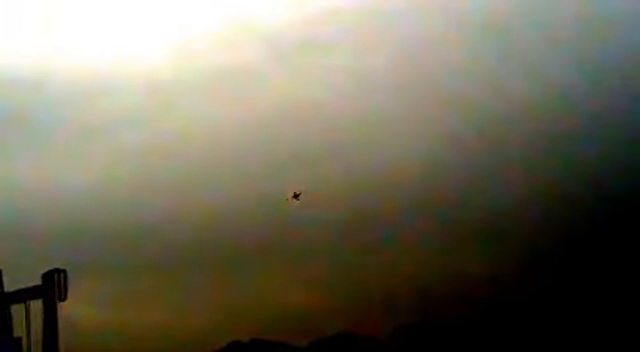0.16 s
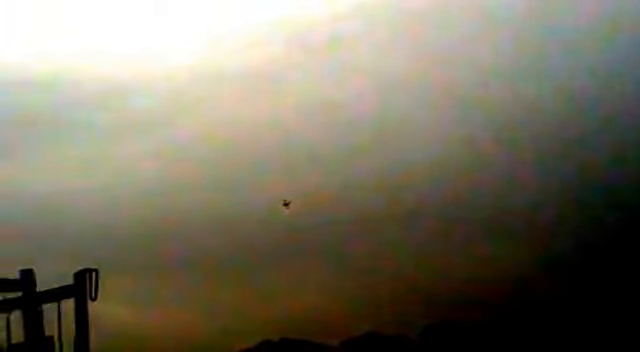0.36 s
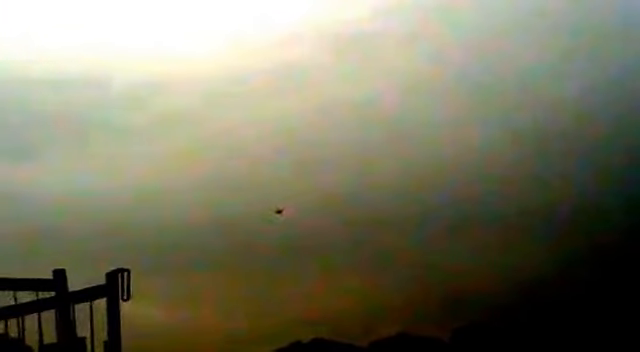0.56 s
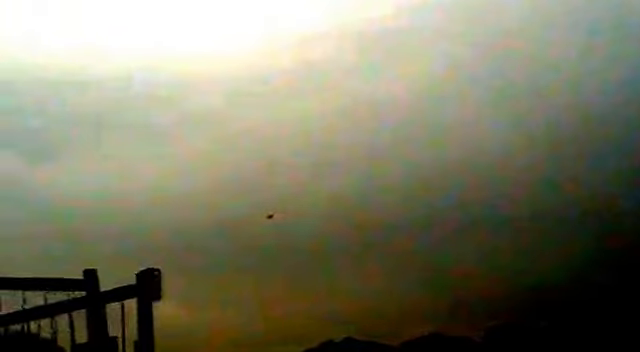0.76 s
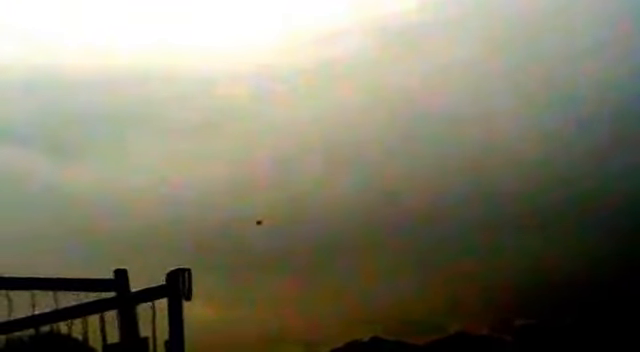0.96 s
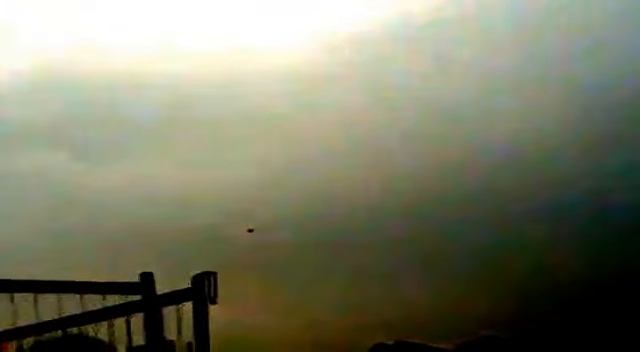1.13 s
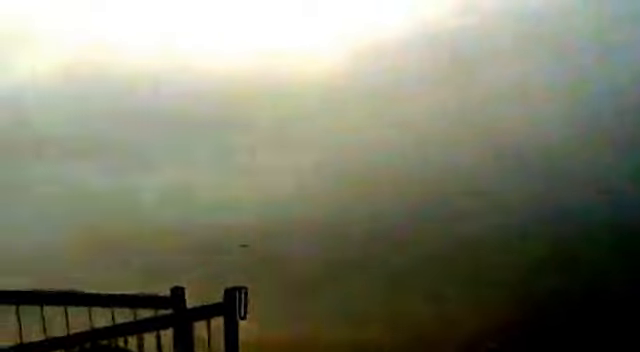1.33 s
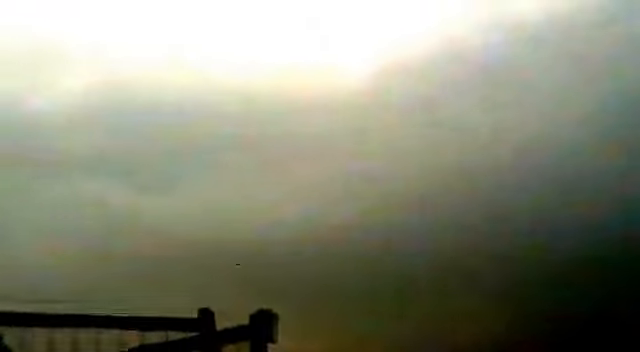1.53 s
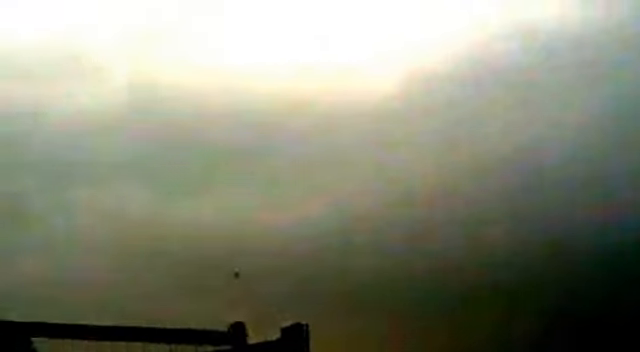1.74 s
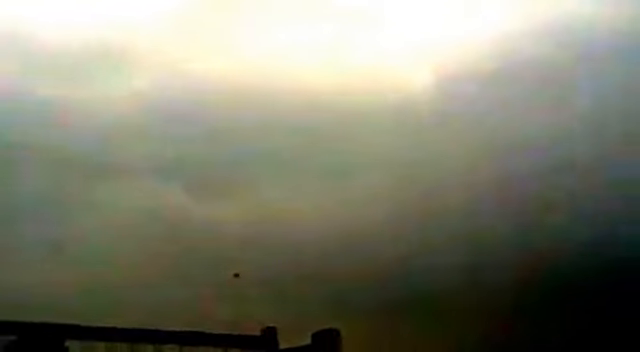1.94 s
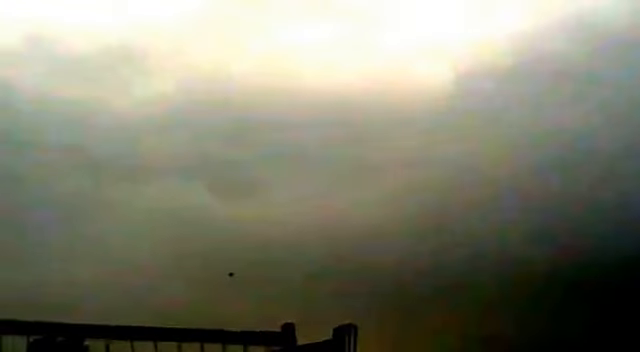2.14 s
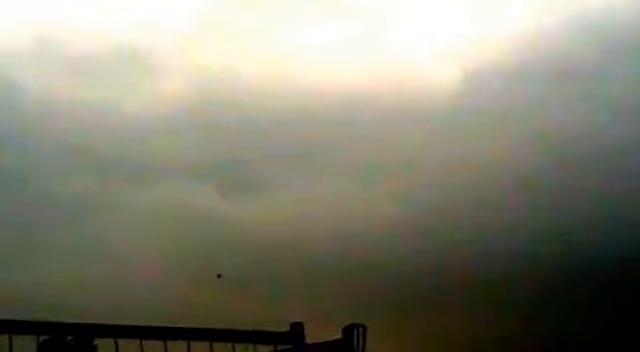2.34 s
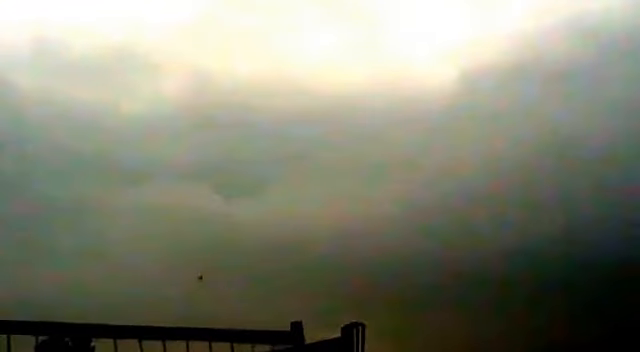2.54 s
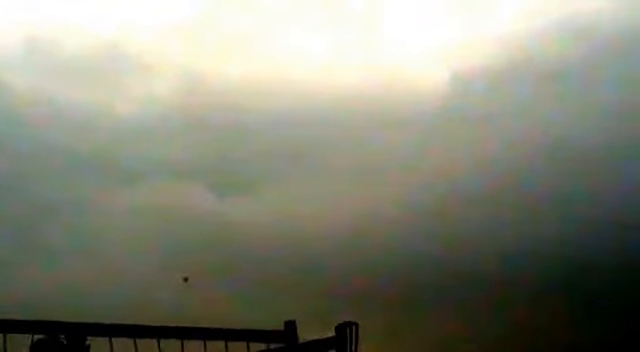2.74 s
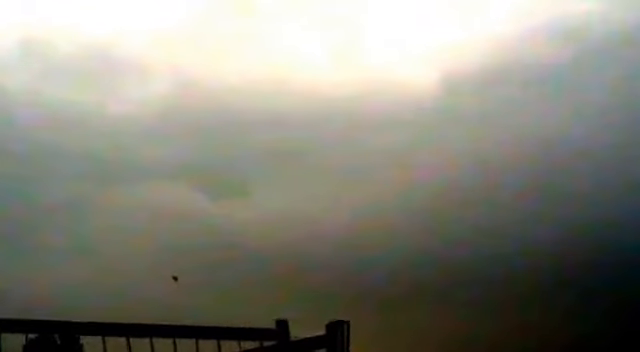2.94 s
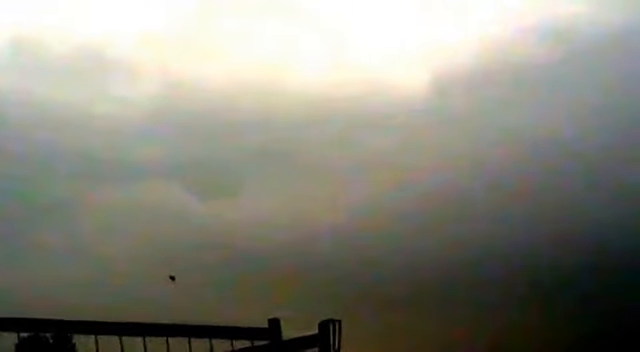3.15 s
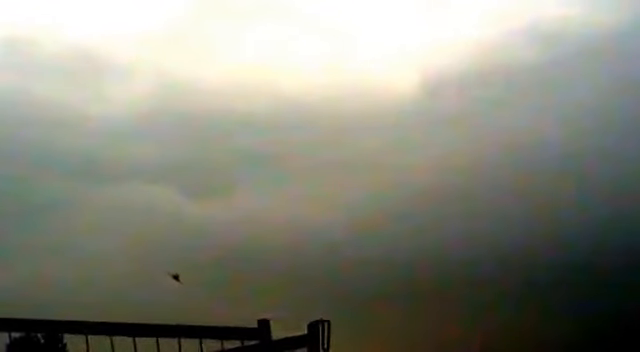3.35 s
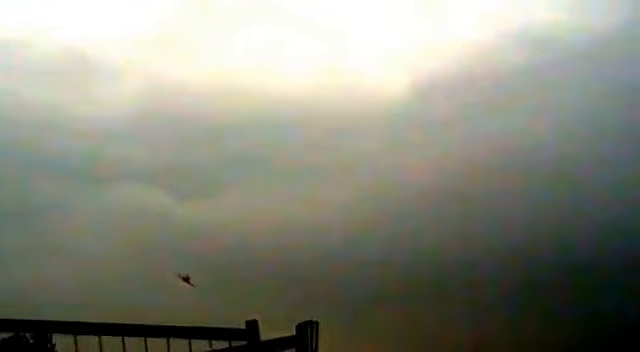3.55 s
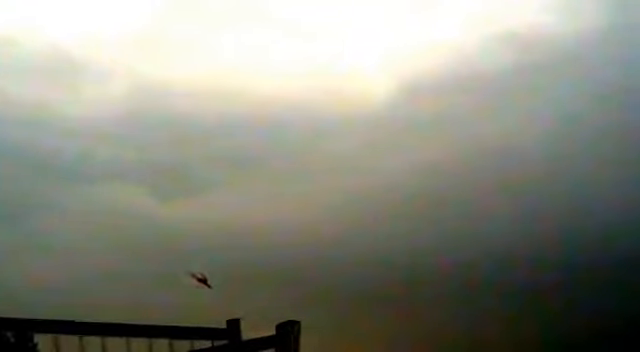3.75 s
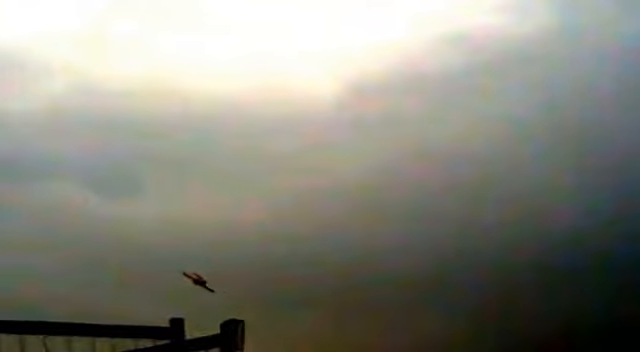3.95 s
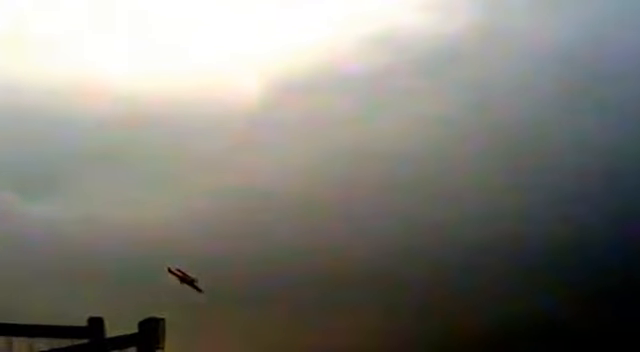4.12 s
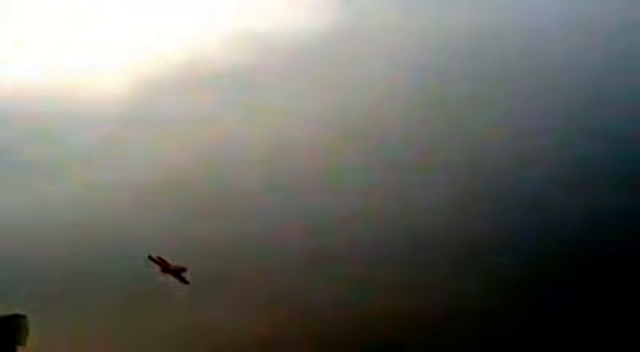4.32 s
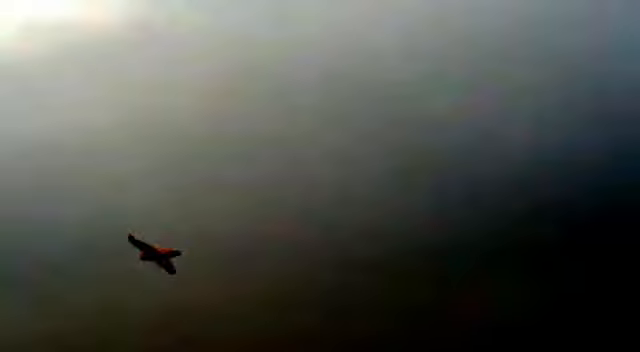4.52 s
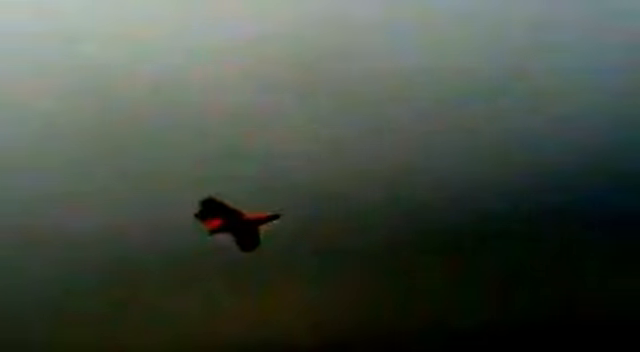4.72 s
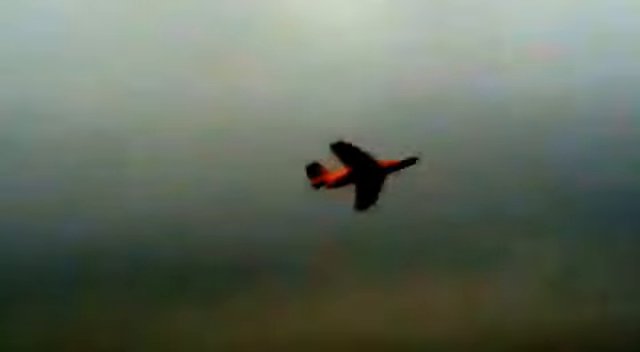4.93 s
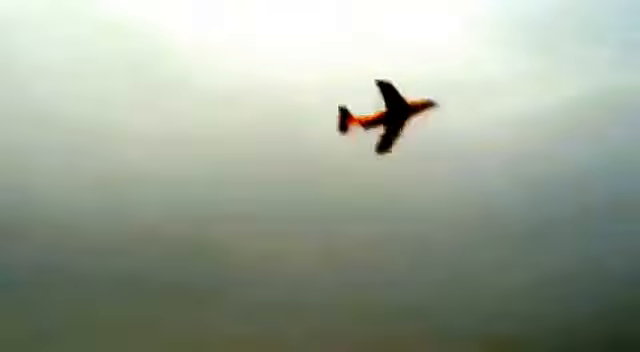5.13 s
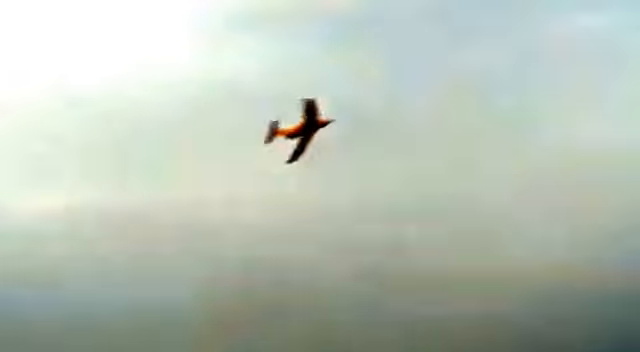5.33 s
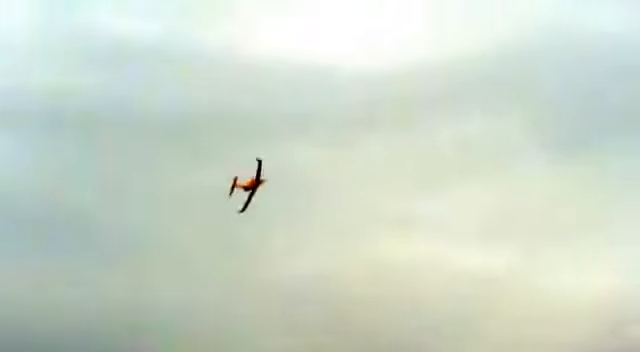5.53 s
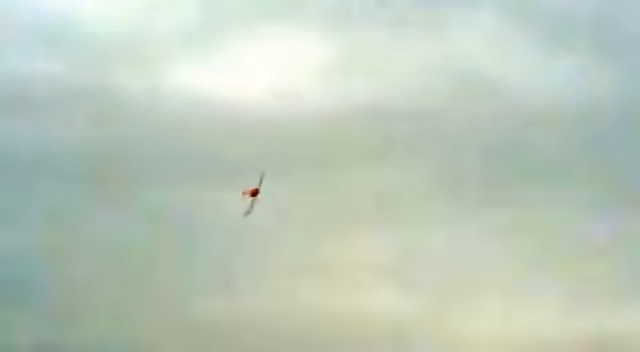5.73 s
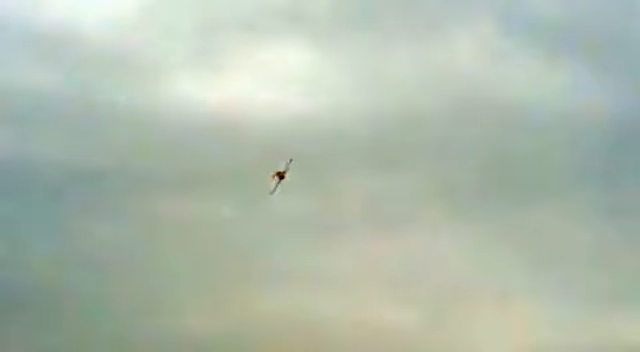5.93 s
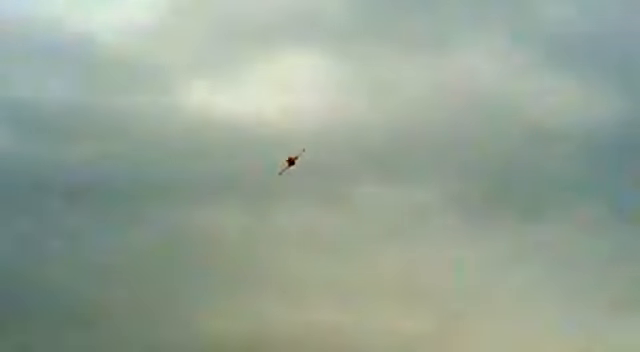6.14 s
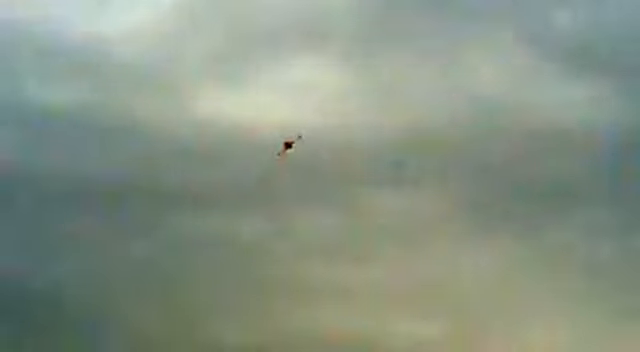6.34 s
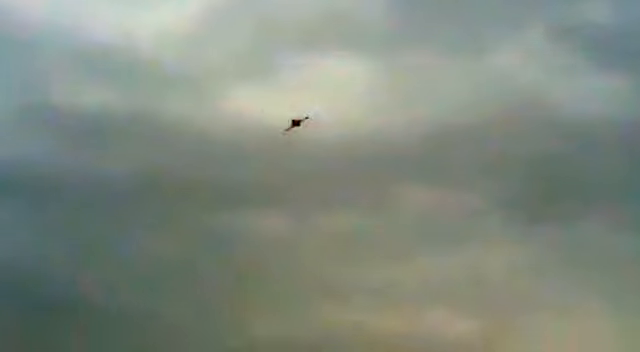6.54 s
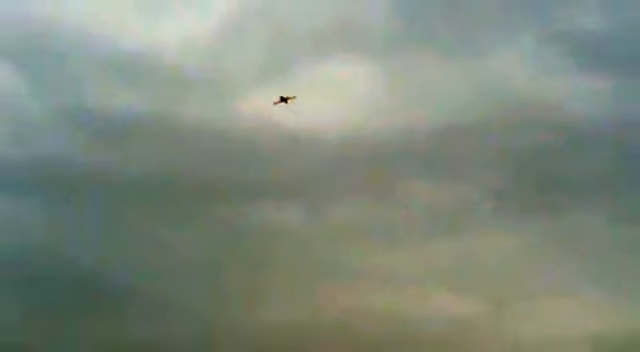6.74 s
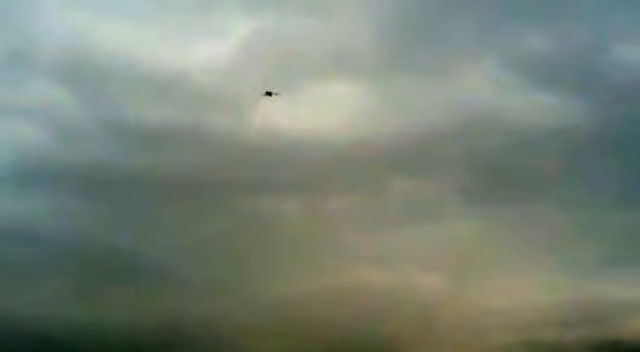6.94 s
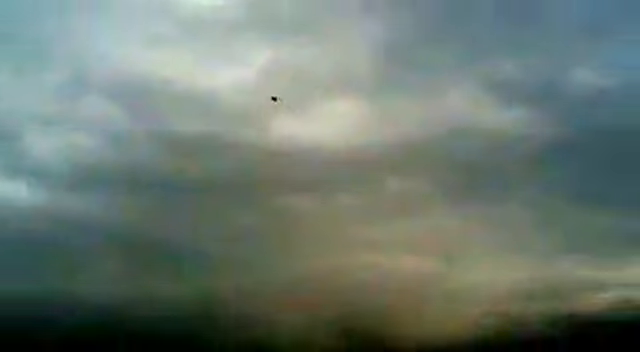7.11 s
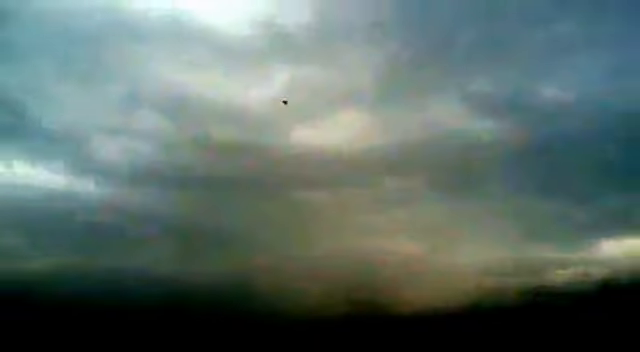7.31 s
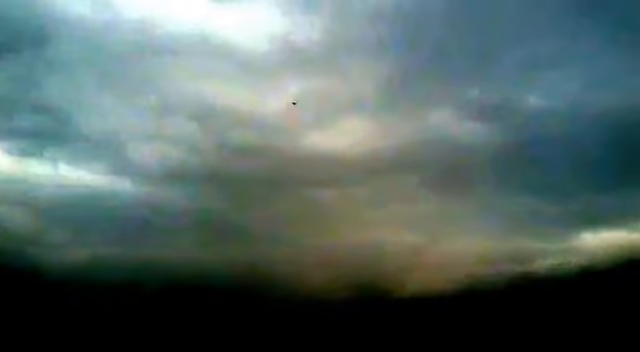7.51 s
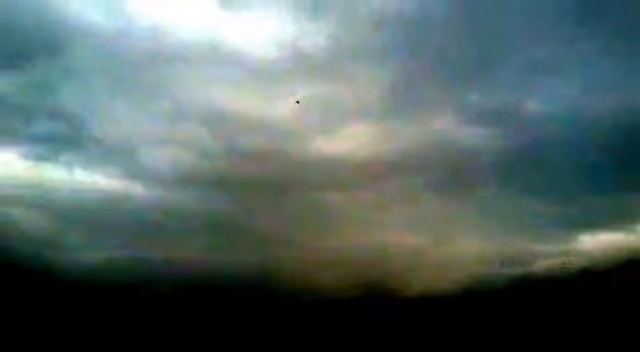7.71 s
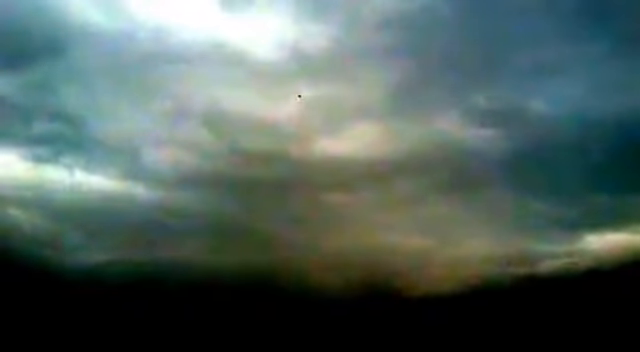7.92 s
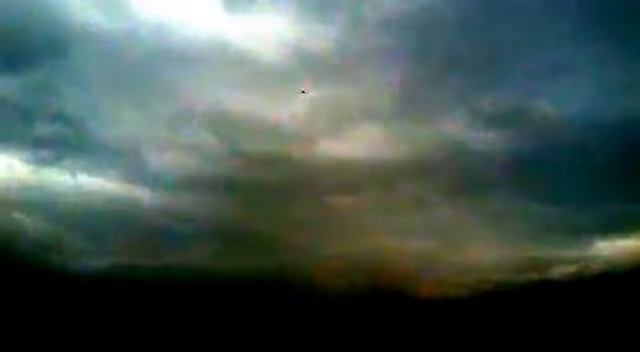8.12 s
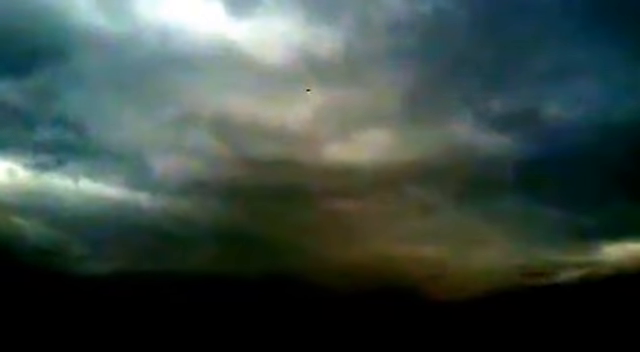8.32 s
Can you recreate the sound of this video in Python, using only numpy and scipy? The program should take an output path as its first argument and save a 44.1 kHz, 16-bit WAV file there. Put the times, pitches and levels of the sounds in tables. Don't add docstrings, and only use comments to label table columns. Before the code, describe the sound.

An electric ducted-fan model jet whines shrilly from afar, rushes past overhead with a falling pitch, then climbs away hissing outdoors.

```python
import sys
import numpy as np
from scipy import signal
from scipy.fft import rfft, irfft, next_fast_len
from scipy.io import wavfile
from scipy.ndimage import uniform_filter1d, map_coordinates

SR = 44100
rng = np.random.default_rng(int(sys.argv[2]) if len(sys.argv) > 2 else 0)


def master_out(mix):
    frames = np.transpose(np.atleast_2d(mix))
    ceiling = np.clip(frames, -1, 1)
    pcm = np.round(ceiling * 32767).astype(np.int16)
    wavfile.write(sys.argv[1], SR, pcm)


def linear_from_db(decibels):
    return 10 ** (np.asarray(decibels, float) / 20)


N = 373527


def unit(x):
    return x / np.sqrt(np.mean(x ** 2) + 1e-20)


def curves(rows):
    s, *cols = np.transpose(rows)
    return [np.interp(np.arange(N) / SR, s, c) for c in cols]


def ramp(start_s, length_s):
    return np.clip((np.arange(N) / SR - start_s) / length_s, 0, 1)


def bell(centre_s, half_s):
    return np.exp(-((np.arange(N) / SR - centre_s) / half_s) ** 2)


def bumps(rows):
    s, half_s, height = np.transpose(rows)
    t = np.arange(0, N / SR + .01, .005)
    total = np.exp(-((t[:, None] - s) / half_s) ** 2) @ height
    return np.interp(np.arange(N) / SR, t, total)


def wobble(rate):
    return map_coordinates(rng.standard_normal(N // 100), [np.arange(N) * rate / SR])


def coloured(x, spectrum):
    m = next_fast_len(N + 8192)
    hz, db = np.transpose(spectrum)
    gain_db = np.interp(np.log(np.fft.rfftfreq(m, 1 / SR) + 1), np.log(hz), db)
    return irfft(rfft(x, m) * linear_from_db(gain_db), m)[:N]


def noise(spectrum, patchy_db):
    z = signal.stft(rng.standard_normal(N), nperseg=512)[2]
    field = uniform_filter1d(rng.standard_normal(z.shape), size=8, axis=0)
    field = uniform_filter1d(field, size=12, axis=1)
    patchy = signal.istft(z * linear_from_db(patchy_db * unit(field)), nperseg=512)[1][:N]
    return unit(coloured(patchy, spectrum))


def blend(share, first, second, patchy_db):
    share = np.clip(share, 0, 1)
    return np.sqrt(1 - share) * noise(first, patchy_db) + np.sqrt(share) * noise(second, patchy_db)


def tone(hz, db, flicker_db, drift_hz):
    level = linear_from_db(db + 4 + flicker_db * wobble(22))
    return level * np.sin(2 * np.pi * np.cumsum(hz + drift_hz * wobble(60)) / SR)


def flight():
    pass_s, near_s, mach = 5.36, .3, .12
    along = (np.arange(N) / SR - pass_s) / near_s
    doppler = 1 / (1 + mach * along / np.sqrt(1 + along ** 2))
    return doppler, -10 * np.log10(1 + along ** 2)


def behind():
    turn_s, turn_length_s = 5.24, 0.42
    return ramp(turn_s - turn_length_s / 2, turn_length_s)


# time in seconds, level in dB, intake off axis 0-1.
RUSH = [(0, -42.5, 1), (.3, -43.5, 0.98), (.85, -38, 0.5), (1.27, -38.5, 0.58), (1.77, -30.5, 0.55),
        (1.98, -34, 0.57), (2.33, -30.5, 0.83), (2.65, -31, 0.47), (2.82, -24, 0.22), (3.25, -27.5, 0.13),
        (4.4, -17, 0.06), (4.75, -16.5, 0.01), (5.0, -14.5, 0), (5.5, -14, 0.4), (5.95, -15, 0.6),
        (6.27, -24.5, 0.98), (7.05, -22, 0.92), (8.47, -28.5, .8)]


def layer_db(rear, pass_db, swing, far, rear_db):
    duct_db = curves(RUSH)[0] + 13
    return pass_db + swing * duct_db + far * flight()[1] + rear_db * rear


# time in seconds, blade passes in Hz.
FAN = [(0, 3563), (.17, 3582), (.22, 3695), (.42, 3897), (.47, 4070), (.52, 4353), (.6, 4410), (1.1, 4461),
       (2, 4559), (3, 4650), (3.7, 4667), (4.6, 4680), (5.1, 4664), (5.65, 4732), (5.9, 4687), (6.5, 4714),
       (7.5, 4786), (8.47, 4809)]
# centre in seconds, half length in seconds, gain in dB.
FOCUS = [(0.112, 0.075, 26), (0.523, 0.064, 22.5), (.72, .2, 17), (1.072, 0.069, 21.5), (1.52, 0.15, 11),
         (1.74, 0.13, 17.5), (2.42, 0.081, 4), (2.745, 0.068, 4), (3.048, 0.075, 1), (3.452, 0.25, 6.5),
         (4.287, 0.14, 9), (4.55, 0.24, 9.5), (4.983, 0.21, 16), (5.177, 0.034, 14), (5.626, 0.17, 15),
         (5.931, 0.062, 1), (6.264, 0.063, 11.5), (6.72, 0.095, 12.5), (6.92, .14, 13.5),
         (7.128, 0.079, 16.5), (7.362, 0.08, 22), (7.657, 0.14, 19.5), (8.09, 0.17, 17),
         (8.45, 0.089, 16.5)]
# centre in seconds, half length in seconds, gain in dB.
ROLL = [
    (1, 0.9, -6),
    (2.598, .25, 5.5),
    (3.2, 0.42, -13.5),
    (5.27, .12, -6),
    (5.55, .15, -1),
    (6.0, 0.39, 3.5),
    (7.398, 0.091, 14),
    (7.75, .08, 10),
]
# centre in seconds, half length in seconds, gain in dB.
EARLY_HUM = [
    (1.34, 0.74, 8),
]
# start in seconds, rise in seconds, pitch at the jet in Hz, peak in dB,
# fade in dB/s.
WHISTLES = [
    (4.62, 0.52, 3524, -21.5, 199),
    (5.12, 0.039, 3146, -22, 18),
]


def fan():
    doppler, rear = flight()[0], behind()
    shut = ramp(5.2, 0.065)
    hz = curves(FAN)[0] * doppler
    side_on = bell(5.32, .2)

    focus_db = 20 * np.log10(1 + bumps([(s, half_s, linear_from_db(db)) for s, half_s, db in FOCUS]))
    blade_db = layer_db(rear, pass_db=-33, swing=0.89, far=0.09, rear_db=2.5) + focus_db - 10 * side_on
    blades = tone(hz, blade_db, flicker_db=1.6 + 5 * side_on + .6 * rear, drift_hz=7 + 25 * side_on + 3 * rear)

    octave_db = layer_db(rear, pass_db=-46, swing=0.87, far=0.63, rear_db=4.4) + bumps(ROLL)
    octave = tone(2 * hz, octave_db, flicker_db=2.5, drift_hz=14 + 25 * side_on)

    blade_count = 11
    shaft_db = layer_db(shut, pass_db=-50.5, swing=0.2, far=0.49, rear_db=-48) + bumps(EARLY_HUM)
    shaft_db = shaft_db + 14 * ramp(3.74, .5)
    shaft = tone(hz / blade_count, shaft_db, flicker_db=.8, drift_hz=1.65)

    under_db = layer_db(shut, pass_db=-30.5, swing=1.25, far=-0.06, rear_db=-42)
    under_db = under_db + 12.5 * bell(4.03, 0.38)
    under = tone(hz * (1 - 1 / blade_count), under_db, flicker_db=2.0, drift_hz=10)

    whistle = np.zeros(N)
    for s, rise_s, pitch_hz, peak_db, fade_db in WHISTLES:
        level_db = peak_db - fade_db * 4 * ramp(s + rise_s, 4)
        whistle += ramp(s, rise_s) * tone(pitch_hz * doppler, level_db, flicker_db=2.2, drift_hz=14)
    return blades + octave + shaft + under + whistle


# frequency in Hz, density in dB per Hz.
BRIGHT = [(2800, -26.5), (3500, -13.5), (3900, -3.5), (4800, 3), (5500, -4.5), (6000, -13.5), (7000, -33),
          (8000, -71)]
MUFFLED = [(2800, -31), (3500, -6.5), (3900, -0.5), (4400, -1), (5000, -8.5), (5600, -21), (7000, -29),
           (8000, -52.5)]
BODY = [(1800, -25.5), (2300, -12.5), (2600, -7), (3000, -2), (3500, 1.5), (3800, -3.5), (4500, -50.5)]
ROAR = [(100, -52), (200, -8.5), (350, -19.5), (700, 0), (1200, -11), (1600, -5.5), (2100, -6.5),
        (2600, -15), (3500, -36.5)]
EXHAUST = [(100, -52), (200, 0.5), (350, -4.5), (700, 1), (1200, -3), (1600, -2), (2100, -2.5),
           (2600, -4.5), (3500, -50)]
HISS = [(5000, -14), (6300, -0.5), (7500, -2.5), (9000, -4.5), (11000, -15), (12500, -29.5), (14000, -45),
        (16000, -100)]
# centre in seconds, half length in seconds, gain in dB.
SURGES = [
    (5.5, 0.043, 2),
    (5.7, 0.023, 1),
    (5.77, .04, -0.5),
    (7.22, .04, -1.5),
]
# centre in seconds, half length in seconds, gain in dB.
TIP_GUSTS = [
    (2.95, 0.26, -6.5),
    (4.8, 0.22, 0),
    (5.25, .12, -2.5),
    (5.803, 0.1, 2.5),
    (6.15, 0.09, -3.5),
    (7.6, 0.33, 1.5),
]


def airflow():
    top_db, off_axis = curves(RUSH)
    rear = behind()
    eddies_db = .5 * wobble(14) + bumps(SURGES)
    top = linear_from_db(top_db - 1.5 + eddies_db) * blend(off_axis, BRIGHT, MUFFLED, patchy_db=1.1)

    body_db = layer_db(rear, pass_db=-19, swing=0.95, far=0.1039, rear_db=0.24)
    body_db = body_db + 9.5 * off_axis * (1 - rear)
    body = linear_from_db(body_db - 1.5 + eddies_db) * noise(BODY, patchy_db=1.1)

    roar_db = layer_db(rear, pass_db=-31, swing=0.26, far=0.25, rear_db=-0.5)
    roar_db = roar_db + 5 * bell(6.39, 0.51)
    roar = linear_from_db(roar_db - 2.0) * blend(rear, ROAR, EXHAUST, patchy_db=0.8)

    tips_db = layer_db(rear, pass_db=-38, swing=0.38, far=0.68, rear_db=5) + bumps(TIP_GUSTS)
    return top + body + roar + linear_from_db(tips_db + eddies_db) * noise(HISS, patchy_db=2.5)


# time in seconds, delay in ms.
GROUND = [(0, 1.46), (1.4, 1.38), (4.4, 1.48), (5, 1.54), (5.1, 1.64), (5.25, 1.93), (5.37, 2.27),
          (5.5, 2.85), (5.62, 3.5), (5.8, 4.12), (6.2, 4.46), (7.4, 5.1), (7.8, 5.46), (8.3, 5.66)]
# centre in seconds, half length in seconds, loss of strength 0-1.
BOUNCE_LOSS = [
    (4.9, 0.18, 0.22),
    (5.65, 0.19, 0.36),
]


def ground(x):
    dull = coloured(x, [(300, -0.5), (1200, 1.5), (3000, -0.5), (6000, -3.0), (12000, -9.0)])
    strength = 0.55 + 0.04 * behind() - bumps(BOUNCE_LOSS)
    delay = curves(GROUND)[0] * SR / 1000
    return x + strength * map_coordinates(dull, [np.arange(N) - delay])


# frequency in Hz, density in dB per Hz.
TRAFFIC = [(20, -27), (35, -14), (62, 1.5), (100, -3.5), (200, -6.5), (380, -14), (1000, -14), (5000, -45),
           (9000, -42), (12000, -36), (14300, -43), (15200, -74)]


def traffic():
    return linear_from_db(-41.5) * noise(TRAFFIC, patchy_db=-0.1)


# frequency in Hz, density in dB per Hz.
GRAVEL = [(500, -24), (1500, -9), (2800, -1), (4500, 0), (6000, -5), (9000, -9), (12000, -13), (13200, -34),
          (16000, -60)]
# start in seconds, length in seconds, crunch in dB.
STEPS = [
    (0.052, 0.1, -36.5),
    (0.277, 0.03, -50),
    (.69, 0.061, -37.5),
    (0.761, 0.043, -29),
    (1.415, 0.094, -33),
    (2.116, 0.077, -40),
    (2.305, 0.019, -40),
    (4.0, 0.034, -36.5),
    (7.636, 0.024, -35),
]
# time in seconds, peak in dB, pitch in Hz.
SNAPS = [(.078, -24, 3800), (.285, -32, 7000), (.71, -21, 3200), (.713, -24, 4000), (.718, -19, 5000),
         (.767, -24, 7500), (.778, -20, 4500), (.78, -20, 3300), (.81, -19, 3300), (.8125, -18, 3600),
         (1.449, -22, 5000), (1.884, -29, 6500), (2.162, -24, 6000), (2.336, -22, 3500)]


def feet():
    t = np.arange(N) / SR
    press = np.zeros(N)
    for s, length_s, db in STEPS:
        press += linear_from_db(db) * np.sin(np.pi * np.clip((t - s) / length_s, 0, 1)) ** 0.71
    hits = rng.random(N) < 2500 / SR
    force = linear_from_db(2.9 * np.minimum(rng.exponential(size=N), 3)) * rng.standard_normal(N)
    crunch = press * unit(coloured(hits * force + 0.17 * rng.standard_normal(N), GRAVEL))

    snaps, life_s = np.zeros(N), np.arange(200) / SR
    for s, db, hz in SNAPS:
        ring = np.sin(2 * np.pi * hz * life_s) + .4 * rng.standard_normal(len(life_s))
        snaps[round(s * SR):][:len(life_s)] += linear_from_db(db - 60 * life_s / .004) * ring
    return crunch + coloured(snaps, [(1000, -22), (2500, 6.0), (10000, -6), (12500, -18), (14500, -48)])


def tick():
    tick_s, peak_db = 7.568, -3
    click = np.zeros(N)
    click[round(tick_s * SR)] = linear_from_db(peak_db + 7)
    return coloured(click, [(2500, -30), (4500, 6), (5500, 2), (7000, -5), (9500, -6), (12000, -1),
                            (13500, -10), (16000, -26)])


def scene():
    return (fan() + ground(airflow()) + traffic() + feet() + tick())[None]


# frequency in Hz, step in dB.
COARSE = [(4500, -70), (5700, -38), (6900, -28), (8300, -24), (10000, -23), (12000, -22), (13500, -24),
          (14600, -24), (15700, -19)]


def starved(x, follow):
    hop, lead = 1024, 1024 * 2 - 913
    k, n = np.arange(hop) + .5, np.arange(2 * hop) + .5 + hop / 2
    window = signal.windows.kaiser_bessel_derived(2 * hop, 4 * np.pi)[:, None]
    basis = window * np.cos(np.pi / hop * np.outer(n, k)) * np.sqrt(2 / hop)
    blocks = np.pad(x, (lead, 3 * hop - (N + lead) % hop)).reshape(-1, hop)
    lines = np.hstack([blocks[:-1], blocks[1:]]) @ basis
    loudness = np.sqrt(np.mean(lines ** 2, axis=1, keepdims=True) + 1e-9)
    step = loudness ** follow * linear_from_db(np.interp(k * SR / 2 / hop, *np.transpose(COARSE)))
    rounded = np.sign(lines) * np.floor(np.abs(lines) / step + 0.45) * step
    frames = rounded @ basis.T
    first = np.pad(frames[:, :hop], ((0, 1), (0, 0)))
    second = np.pad(frames[:, hop:], ((1, 0), (0, 0)))
    return (first + second).ravel()[lead:lead + N]


def band_limit(x):
    return signal.sosfilt(signal.butter(12, 15690, fs=SR, output="sos"), x)


def record(dry):
    held = dry[0] / (1 + np.abs(dry[0] / .98) ** 12) ** (1 / 12)
    mix = starved(held, follow=0.64)[None]
    return band_limit(mix)


dry = scene()
out = record(dry)
master_out(out)
```